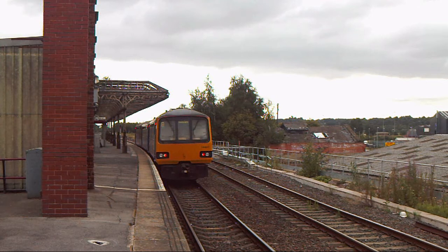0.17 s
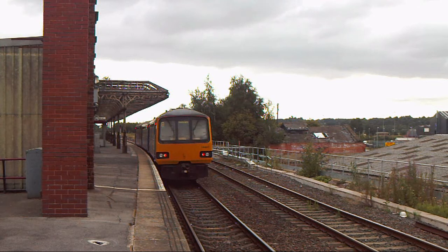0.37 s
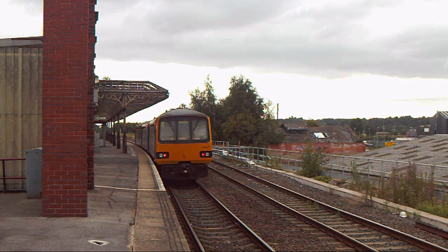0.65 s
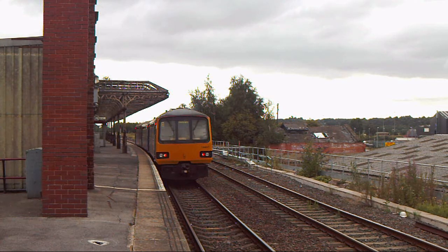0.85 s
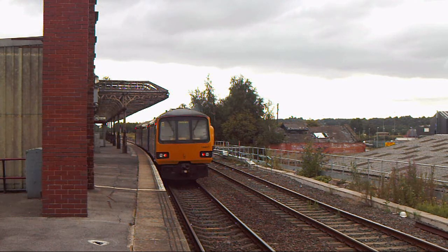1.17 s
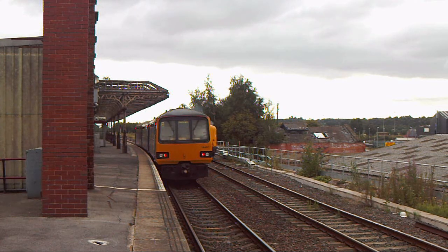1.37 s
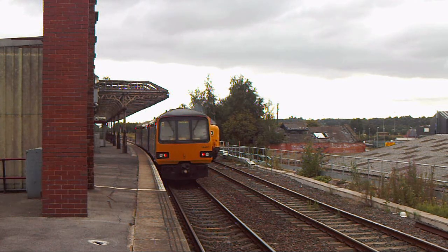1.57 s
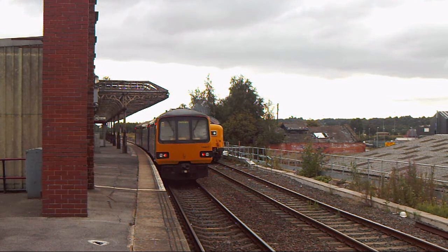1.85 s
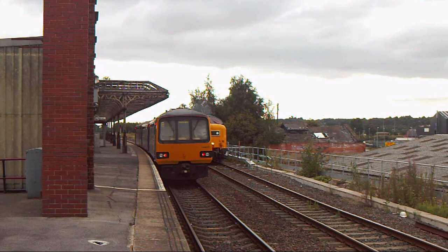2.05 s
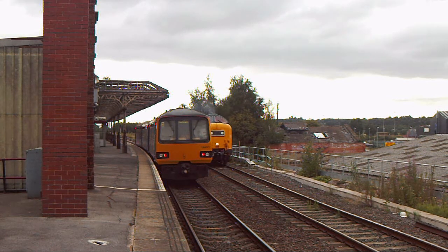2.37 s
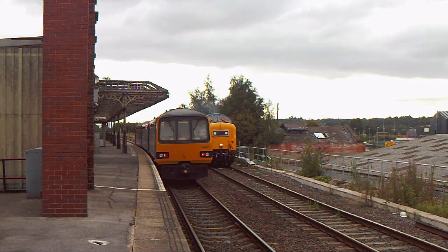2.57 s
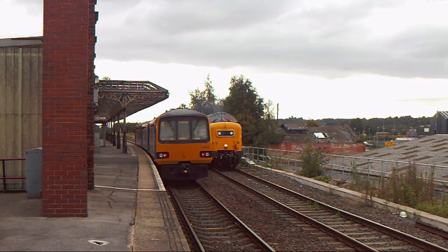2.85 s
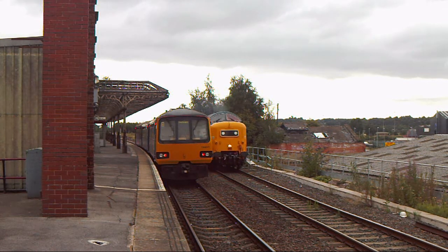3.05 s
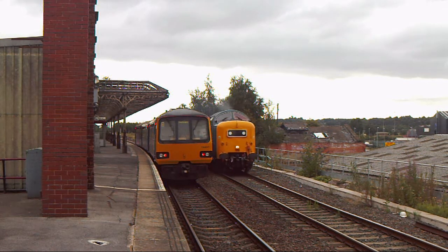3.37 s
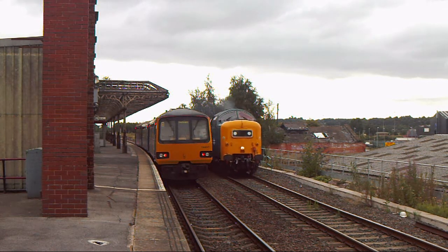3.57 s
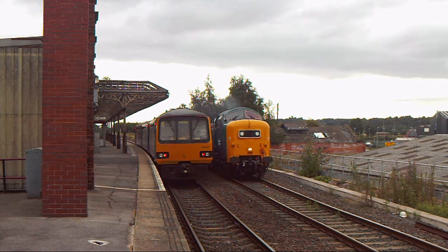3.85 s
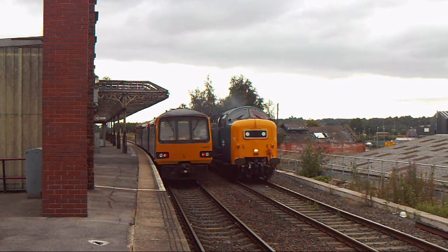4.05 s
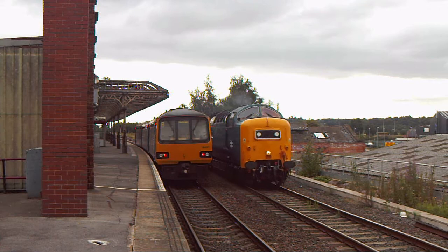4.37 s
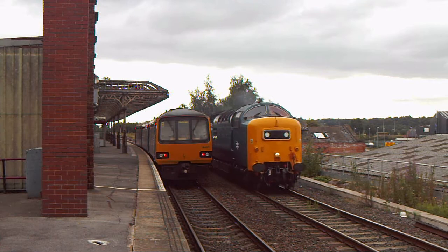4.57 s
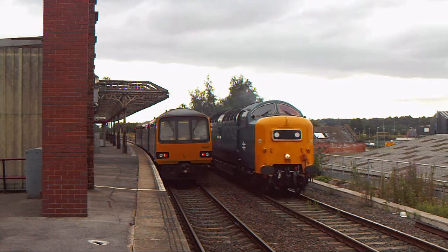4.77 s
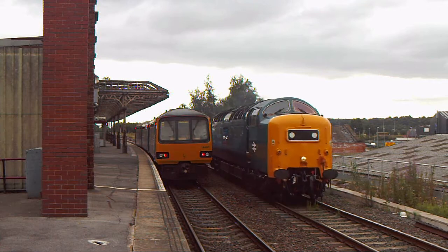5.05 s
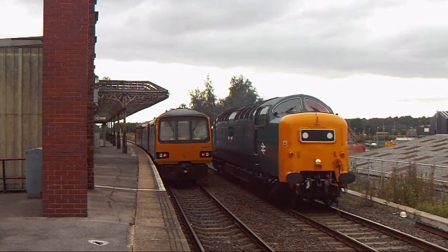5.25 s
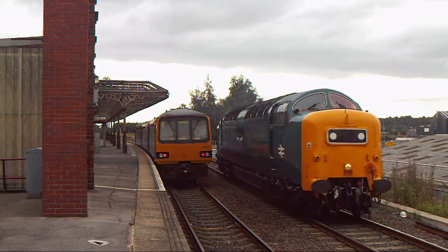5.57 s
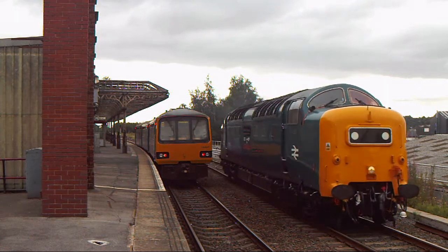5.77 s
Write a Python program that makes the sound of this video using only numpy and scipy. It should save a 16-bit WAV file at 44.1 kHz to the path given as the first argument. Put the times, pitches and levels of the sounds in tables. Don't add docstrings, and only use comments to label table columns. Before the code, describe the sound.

Low diesel drone grows steadily from behind an idling railcar until it dominates, with metallic wheel clanks, faint rattles and camcorder hiss.

```python
import sys
import numpy as np
from scipy import signal
from scipy.fft import rfft, irfft, next_fast_len
from scipy.io import wavfile
from scipy.ndimage import uniform_filter1d

SR = 44100
rng = np.random.default_rng(int(sys.argv[2]) if len(sys.argv) > 2 else 0)


def field_ratio(decibels):
    return 10 ** (np.asarray(decibels, dtype=float) / 20)


def unload_wav(signal):
    wavfile.write(
        sys.argv[1],
        SR,
        np.round(np.clip(np.atleast_2d(signal).T, -1, 1) * 32767).astype(np.int16),
    )


N = 260631
T = np.arange(N) / SR


def curves(table):
    times, *columns = np.transpose(table)
    return [np.interp(T, times, column) for column in columns]


def bumps(rows):
    return sum(db * np.exp(-((T - s) / half_s) ** 2) for s, db, half_s in rows)


def walk(rate):
    hold = int(SR / rate)
    held = np.repeat(rng.standard_normal(N // hold + 1), hold)
    return 1.17 * uniform_filter1d(uniform_filter1d(held, hold), hold)[:N]


def band(hz, width_hz):
    size = next_fast_len(N)
    f = np.arange(size // 2 + 1) * SR / size
    white = rng.standard_normal(2 * len(f)).view(complex)
    x = irfft(white * np.exp(-((f - hz) / width_hz) ** 2), size)[:N]
    return x / x.std()


def coloured(colour, flicker_db, level_db):
    hz, db = np.transpose(colour)
    out = 0
    for f in 7 * 2 ** np.arange(0, 10.7, .25):
        weight_db = np.interp(np.log(f), np.log(hz), db) + 10 * np.log10(f)
        out = out + band(f, f / 7) * field_ratio(weight_db + level_db(f) + flicker_db * walk(6))
    return out


def approach(near_db, share, far_db=-120):
    # t/s, level against the end/dB
    nearness = [(0.0, -25), (1.2, -24), (2.0, -20), (2.75, -18.5), (3.5, -13), (4.0, -9.5), (4.5, -8),
                (5.0, -6.5), (5.4, -4), (5.91, -1.5)]
    direct_db = near_db + share * curves(nearness)[0]
    return 10 * np.log10(field_ratio(direct_db) ** 2 + field_ratio(far_db) ** 2)


def drone(crank):
    # t/s, level/dB
    main_beat = [(0.0, -46), (0.15, -22), (1.0, -24.5), (2.0, -26.5), (2.3, -22.5), (3.2, -24),
                 (3.8, -29.5), (4.15, -19.5), (4.4, -18.5), (4.9, -12.5), (5.3, -11), (5.91, -10)]
    # t/s, depth/dB, half length/s
    echo_fades = [(.34, -6.5, 0.072), (.7, -3, .07), (2.15, -7, 0.071), (2.41, -9, 0.036),
                  (3.96, -14, 0.068), (4.19, -10, 0.09), (5.68, -11, 0.036), (5.86, -16, 0.035)]
    # t/s, change/dB, half length/s
    under_swells = [
        (.6, -8, .3),
        (3.65, 2, .45),
        (4.35, -10, 0.14),
    ]
    # t/s, lead of order 8/rad, lead of the higher orders/rad
    reflected_path = [(0.0, .8, -.5), (.9, 1.4, -.6), (1.7, .9, .7), (2.1, .1, .6), (2.5, .3, -.2),
                      (3.2, 1., 1.9), (3.65, .3, 1.7), (4.2, -1.2, -.9), (4.7, .2, -.4), (5.05, 0., -.8),
                      (5.5, .1, -.5), (5.91, -.5, -.5)]
    # t/s, change/dB, half length/s
    upper_swells = [(.15, 0.5, 0.19), (.45, -5.5, 0.11), (.93, 4, 0.18), (1.3, -5.5, 0.091),
                    (2.45, 4, 0.38), (3.3, 2.5, 0.15), (3.58, -6, 0.12), (4.2, -5, 0.11),
                    (4.98, 6.5, 0.069), (5.4, 1.5, 0.23)]
    signed_orders = [-2, -4, -5, -6, -7, -11, -14, -15, 16, 17, 18, 19, 21, 22, -23, 24, 25, 26, -27, 30,
                     40]
    orders_db = [-6, -14, -8, -13, -2.5, -9, -11, -19, -11, -0.5, -4, -13.5, -14, -21, -21, -14, -9.5,
                 -13.5, -12, -21, -21]

    under_rad, path_rad = curves(reflected_path)
    main_db = curves(main_beat)[0] + bumps(echo_fades) + 0.48 * walk(16)
    under_db = approach(-14, 1.36) + bumps(under_swells) + 0.92 * walk(7)
    over_db = approach(-24.5, .9, -41) + 2.3 * walk(5.9)
    upper_db = approach(-20.5, 1.86, -43.5) + bumps(upper_swells)

    out = 0
    for order, db, lead in [(9, main_db, 0), (8, under_db, under_rad), (10, over_db, path_rad)]:
        out = out - np.sqrt(2) * field_ratio(db) * np.cos(order * crank + lead)
    for signed, db in zip(signed_orders, orders_db):
        order = abs(signed)
        lead = .9 * (order < 8) + .63 * (order - 17) * (order > 15)
        stray = (.15 + .035 * abs(order - 17.5)) * walk(4)
        phase = order * crank + lead + path_rad * order / 18 + stray
        out -= np.sign(signed) * np.sqrt(2) * field_ratio(upper_db + db + 1.27 * walk(5)) * np.cos(phase)
    return out


def roar(crank):
    # f/Hz, level/dB per Hz
    roar_colour = [(20, -1), (45, -17), (85, 6.5), (165, 0.5), (210, -3.5), (300, -4.5), (550, -13.5),
                   (950, -30.5), (1200, -24.5), (1900, -24), (2500, -20.5), (3600, -35.5), (4200, -31.5),
                   (8000, -44.5)]
    # t/s, rise/dB, half length/s
    intakes = [
        (2.85, 3, 0.38),
    ]
    gas_db = approach(-27.5, 1.04)
    casing_db = approach(-33.5, 0.82)
    blower_db = approach(-43, 0.64) + bumps(intakes)

    def mix_db(hz):
        gas = np.clip(np.log(700 / hz) / np.log(1.8), 0, 1)
        blower = np.clip(np.log(hz / 1100) / np.log(1.8), 0, 1)
        casing = 1 - gas - blower
        return gas * (gas_db + 30.5) + blower * (blower_db + 41) + casing * (casing_db + 39.5)

    puff = 1 + 0.034 * np.cos(crank)
    return field_ratio(-56) * coloured(roar_colour, 1.0, mix_db) * puff


def clanks():
    # t/s, peak level/dB, decay t60/s
    wheel_blows = [(2.539, -39, 0.073), (4.182, -34.5, 0.38), (4.261, -45, 0.022), (4.396, -30.5, 0.11),
                   (4.410, -41, 0.13), (4.422, -41.5, 0.36), (4.632, -36, 0.18), (4.65, -45, 0.26),
                   (4.88, -48, 0.18), (5.23, -42, .2), (5.745, -41, 0.27)]
    bright = (band(2630.0, 570.0) + 0.54 * band(5200.0, 2900.0)) * field_ratio(1.4 * walk(360))
    dull = (band(2150.0, 1100.0) + .5 * band(3940.0, 1250.0)) * field_ratio(3.7 * walk(250))
    out = np.zeros(N)
    for s, db, t60 in wheel_blows:
        age = np.clip(T - s, 0, None)
        rise = 1 - np.exp(-age / 0.0041)
        fall = np.log(1000) * age / t60
        out += field_ratio(db) * rise * (bright * np.exp(-2.5 * fall) + .5 * dull * np.exp(-fall))
    return out


def yard():
    # f/Hz, level/dB per Hz
    yard_colour = [(20, -1), (45, 1), (85, -1), (165, -9), (210, -12), (300, -26.5), (550, -11.5),
                   (950, -21), (1200, -22), (1900, -34), (2500, -32.5), (3600, -38), (4200, -38.5),
                   (8000, -45)]
    # t/s, rise/dB, half length/s
    idle_swells = [(.25, 9, 0.41), (2.45, 5.5, 0.73), (3.19, 9, 0.13), (4.31, 9, 0.17), (4.78, 9, .12),
                   (5.2, 6, .08)]
    noise = coloured(yard_colour, 0.81, lambda hz: 0)
    noise = field_ratio(-33.5) * noise / noise.std()

    idle_hz = 39.05 * (1 + 0.013 * walk(2.45))
    phase = 2 * np.pi * np.cumsum(idle_hz) / SR
    hum_db = -39.5 + bumps(idle_swells) + 4 * walk(4.83)
    hum = field_ratio(hum_db) * np.sqrt(2) * (np.sin(phase) + 0.18 * np.sin(2 * phase))

    canopy = field_ratio(-50.5 + 2 * walk(2.42)) * band(545, 30.0)
    return noise + hum + canopy


def panels():
    # f/Hz, width/Hz, level/dB
    loose_panels = [
        (690, 14, -61),
        (836.7, 19, -55.5),
        (1138, 13, -59.5),
    ]
    singing = sum(field_ratio(db + 5.7 * walk(6.94)) * band(hz, width_hz) for hz, width_hz, db in loose_panels)
    knock_s, knock_hz, knock_db, knock_t60_s = 1.759, 600, -27, .03
    age = np.clip(T - knock_s, 0, None)
    decay = np.exp(-np.log(1000) * age / knock_t60_s)
    return singing + field_ratio(knock_db) * np.sin(2 * np.pi * knock_hz * age) * decay


def rumble():
    # t/s, rise/dB, half length/s
    gusts = [(.2, 6, .05), (1.0, -6, .25), (2.14, 14, .15), (2.65, 8, .05), (3.87, 12, 0.049), (4.5, 3, .6),
             (5.09, 20, .06), (5.38, 10, .06), (5.75, 5, .3)]
    return field_ratio(-45.5 + bumps(gusts)) * band(60.0, 11.0)


def shell(x):
    # f/Hz, width/Hz, level/dB
    resonances = [(794, 12, 5.5), (899, 15, 7), (920, 42, -3.5), (1060, 14, 6), (1155, 7.5, 6),
                  (1370, 51, -2.5), (1580, 180, 2), (1920, 210, -3.5), (2200, 37, 2.5), (3880, 67, 0.5),
                  (3980, 77, 3)]
    size = next_fast_len(N)
    f = np.arange(size // 2 + 1) * SR / size
    gain_db = sum(db * np.exp(-((f - hz) / width_hz) ** 2) for hz, width_hz, db in resonances)
    return irfft(rfft(x, size) * field_ratio(gain_db), size)[..., :N]


def scene():
    # t/s, firing rate as heard/Hz
    firing_rate = [(0.0, 127.89), (0.4, 128.76), (0.8, 128.53), (1.2, 127.88), (1.6, 127.14), (2.0, 126.55),
                   (2.4, 125.34), (2.8, 124.29), (3.2, 123.59), (3.6, 123.11), (4.0, 122.89), (4.4, 122.19),
                   (4.8, 121.9), (5.2, 121.62), (5.6, 121.6), (5.91, 122.01)]
    beats_per_turn, start_turns = 9, .152
    turns = start_turns + np.cumsum(curves(firing_rate)[0]) / SR / beats_per_turn
    crank = 2 * np.pi * turns
    mix = drone(crank) + roar(crank) + clanks() + yard() + panels() + rumble()
    return mix[None]


def roll_off(x):
    return signal.sosfilt(signal.butter(12, 15745, fs=SR, output="sos"), x)


def record(dry):
    # f/Hz, level/dB
    scan_lines = [(15734.3, -62), (15674.3, -68), (15614.4, -78), (15554.4, -84), (15494.5, -79),
                  (15434.5, -82)]
    x = np.tanh(.35 * shell(dry)) / .35
    hiss, rounding = field_ratio(-52), field_ratio(-35) * np.abs(x) ** 1.36
    noise = np.sqrt(hiss ** 2 + rounding ** 2) * rng.standard_normal(dry.shape)
    whistle = sum(np.sqrt(2) * field_ratio(db) * np.sin(2 * np.pi * hz * T) for hz, db in scan_lines)
    return roll_off(x + noise + whistle)


dry = scene()
out = record(dry)
unload_wav(out)
```